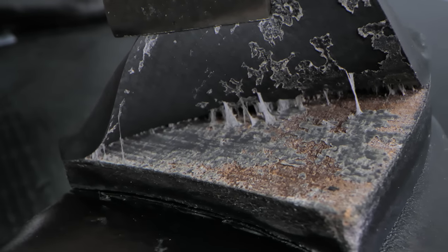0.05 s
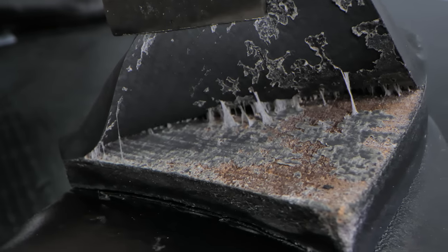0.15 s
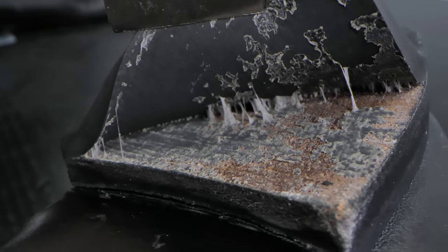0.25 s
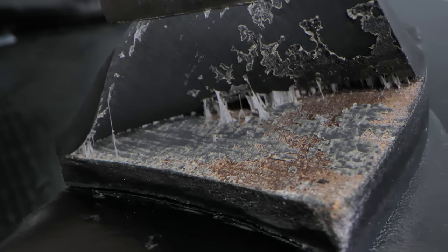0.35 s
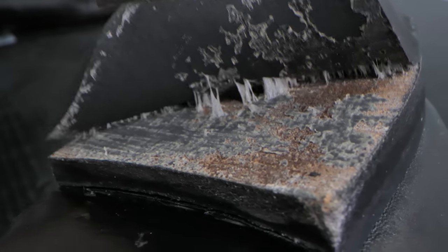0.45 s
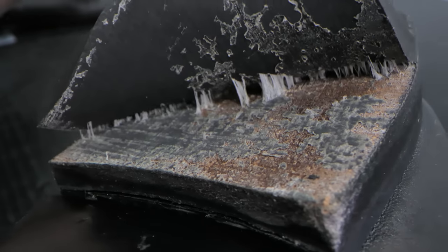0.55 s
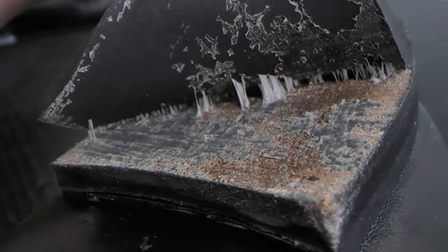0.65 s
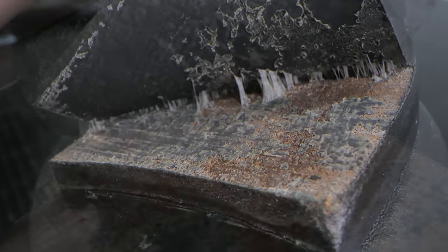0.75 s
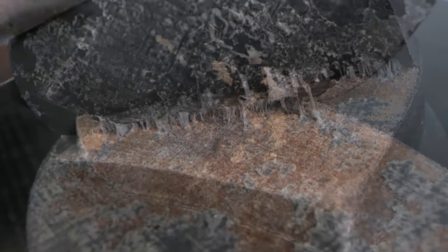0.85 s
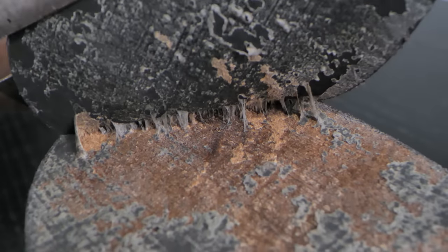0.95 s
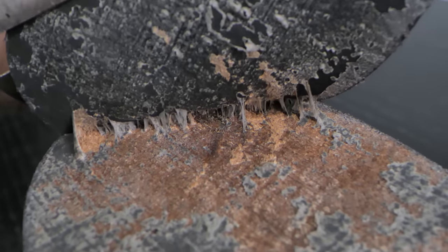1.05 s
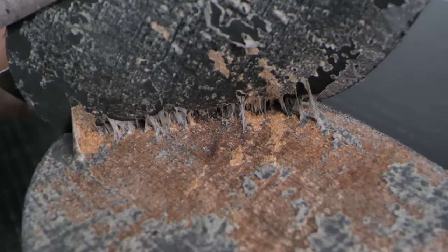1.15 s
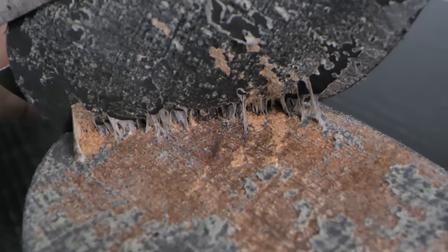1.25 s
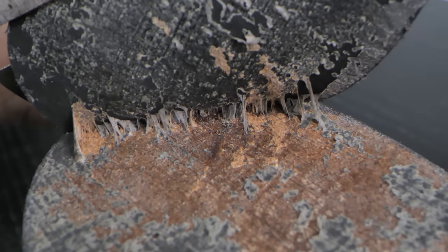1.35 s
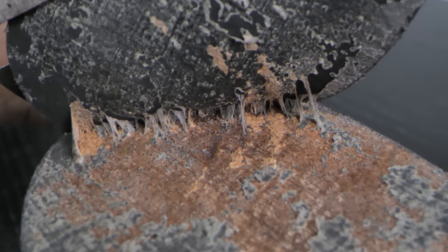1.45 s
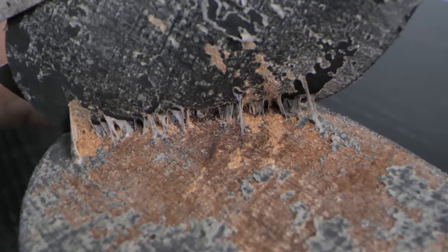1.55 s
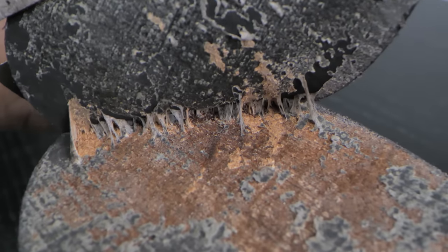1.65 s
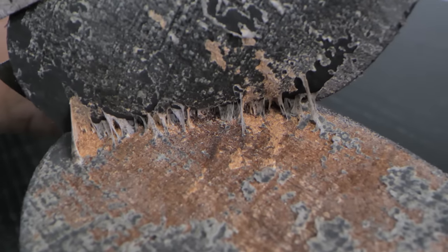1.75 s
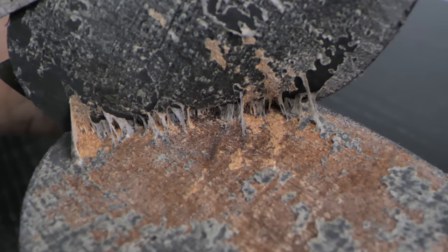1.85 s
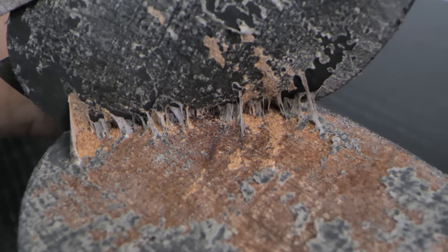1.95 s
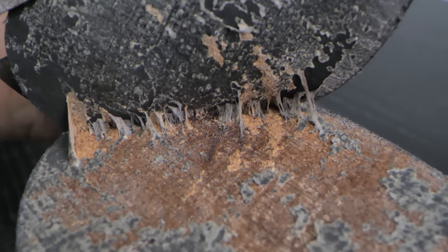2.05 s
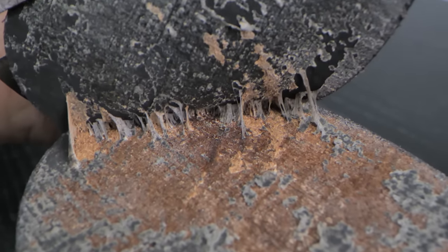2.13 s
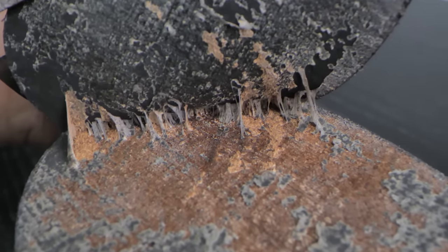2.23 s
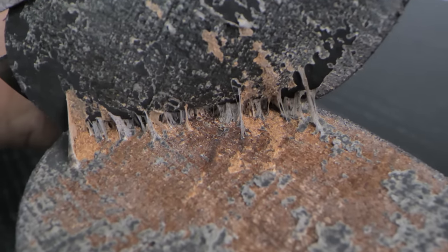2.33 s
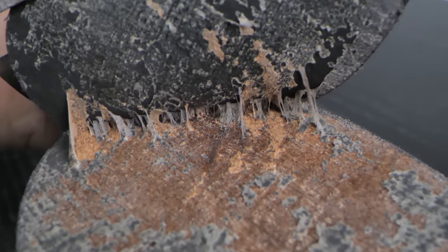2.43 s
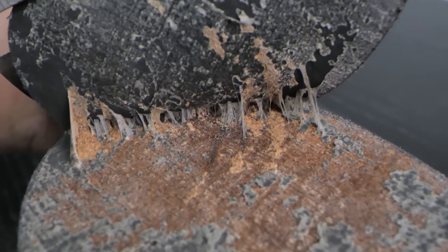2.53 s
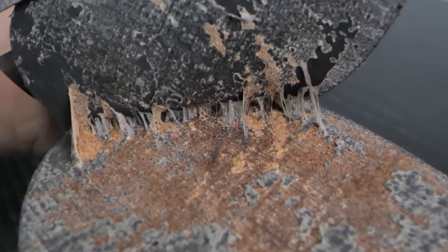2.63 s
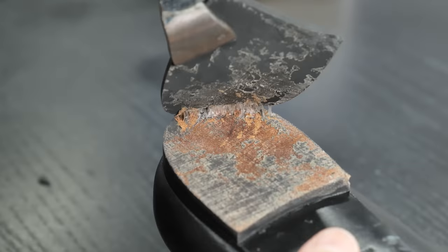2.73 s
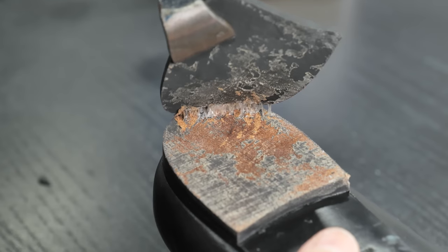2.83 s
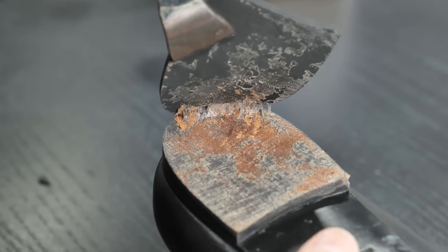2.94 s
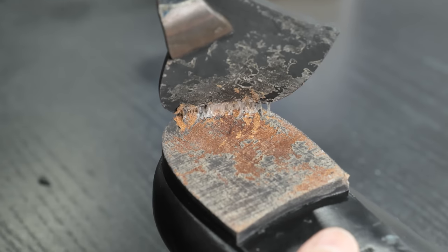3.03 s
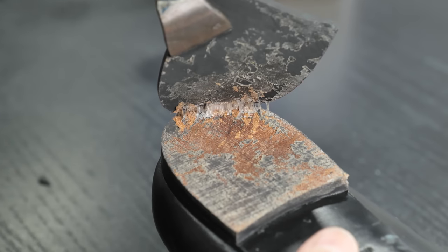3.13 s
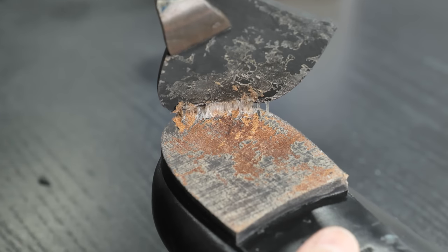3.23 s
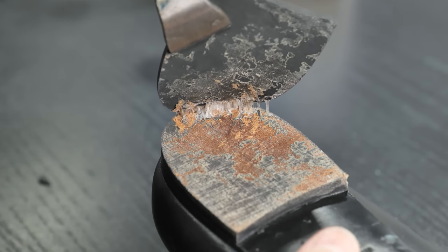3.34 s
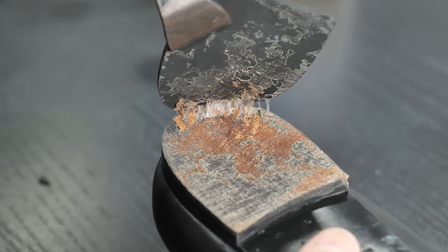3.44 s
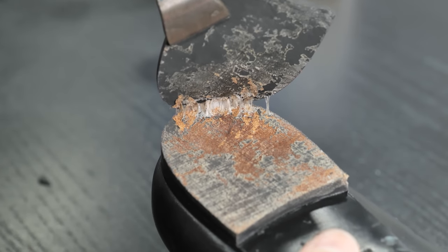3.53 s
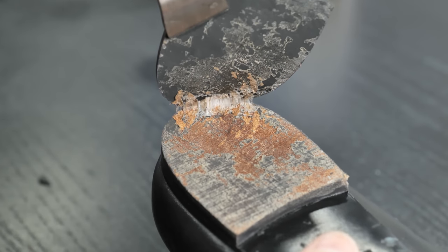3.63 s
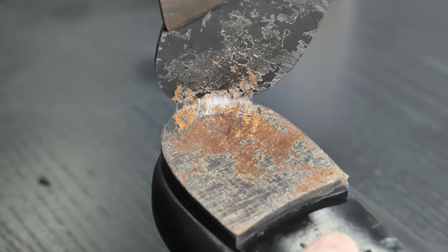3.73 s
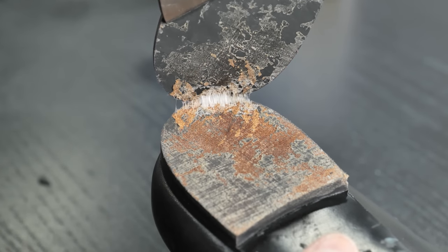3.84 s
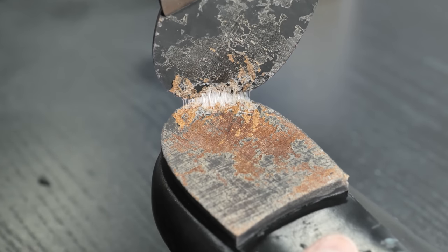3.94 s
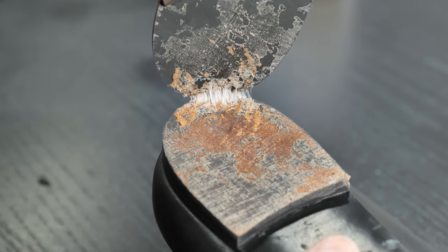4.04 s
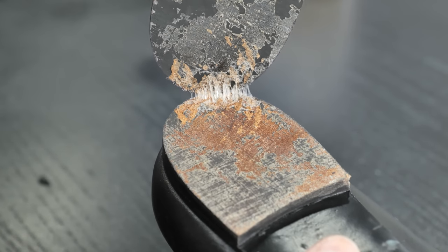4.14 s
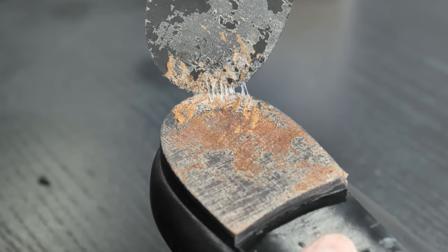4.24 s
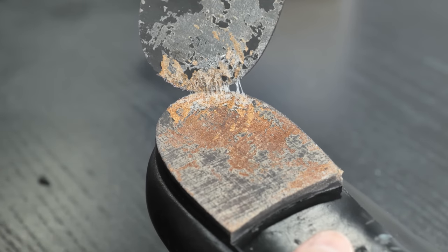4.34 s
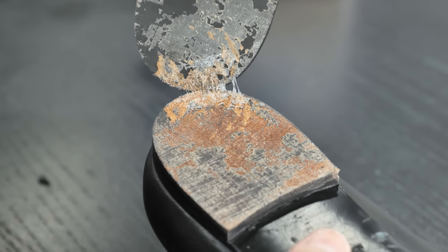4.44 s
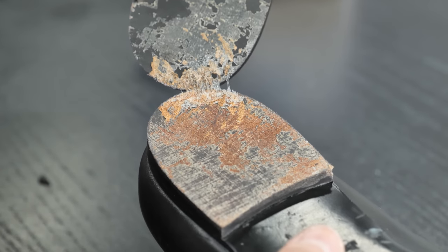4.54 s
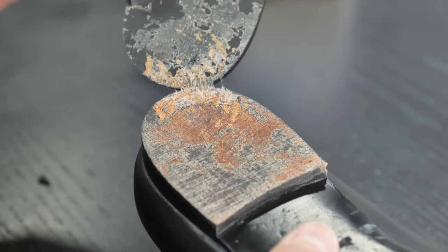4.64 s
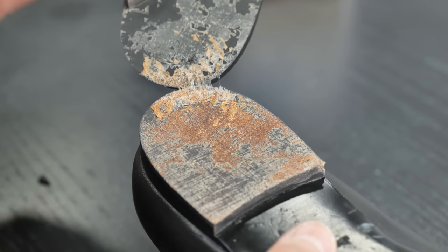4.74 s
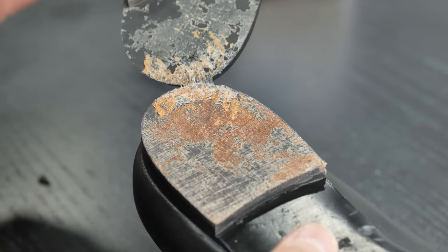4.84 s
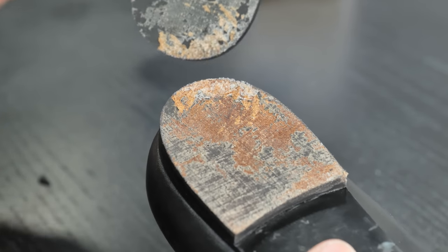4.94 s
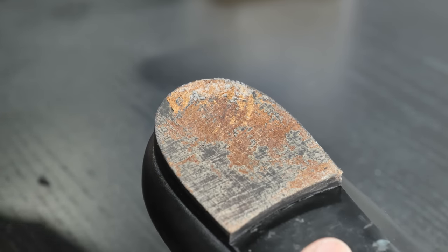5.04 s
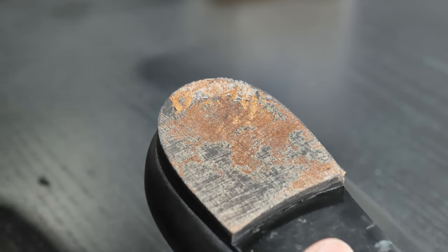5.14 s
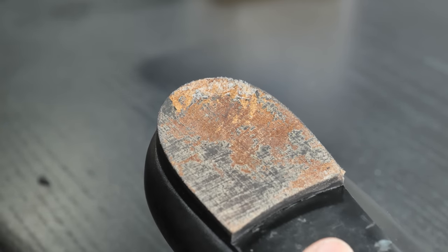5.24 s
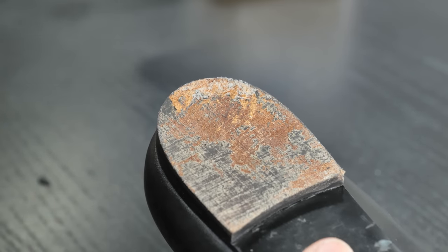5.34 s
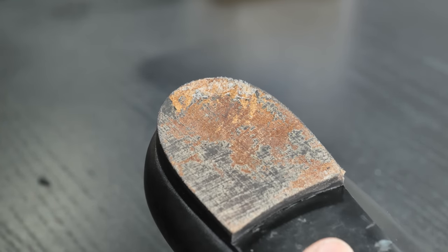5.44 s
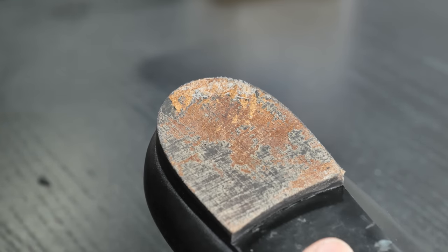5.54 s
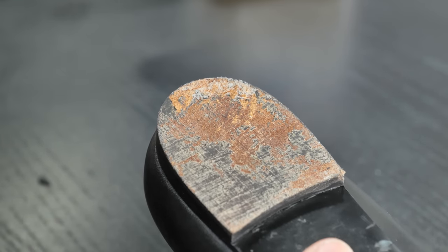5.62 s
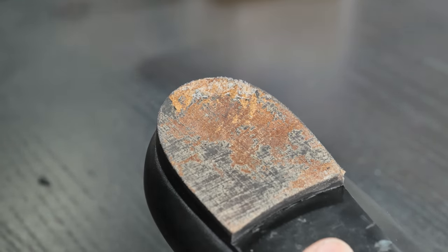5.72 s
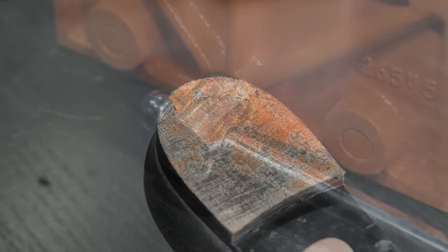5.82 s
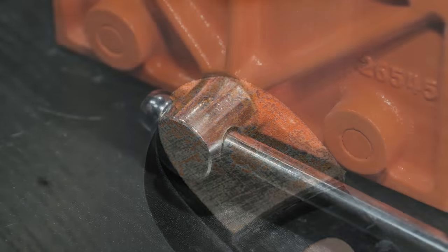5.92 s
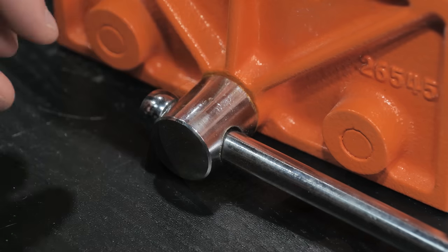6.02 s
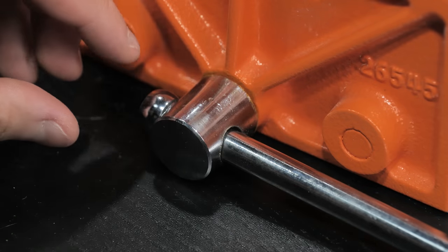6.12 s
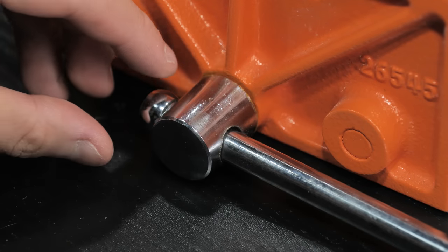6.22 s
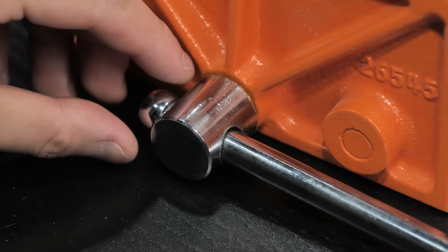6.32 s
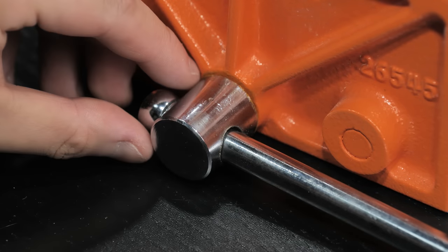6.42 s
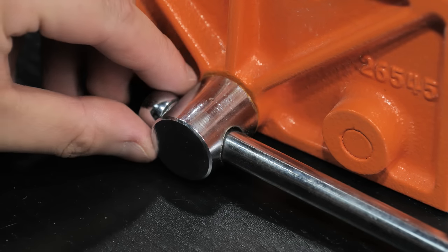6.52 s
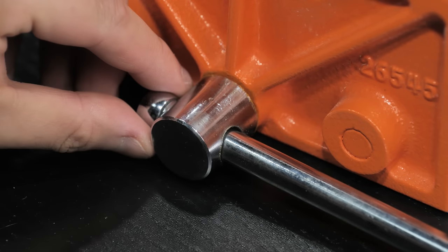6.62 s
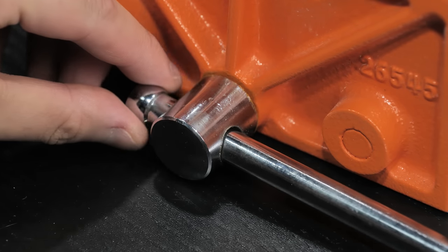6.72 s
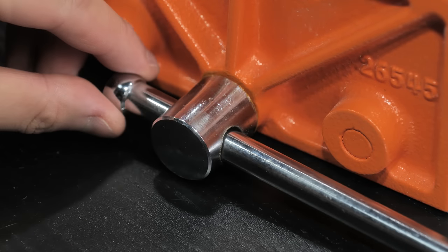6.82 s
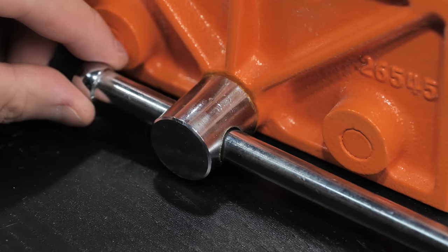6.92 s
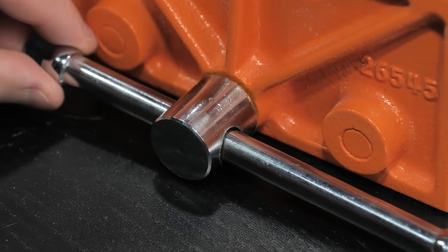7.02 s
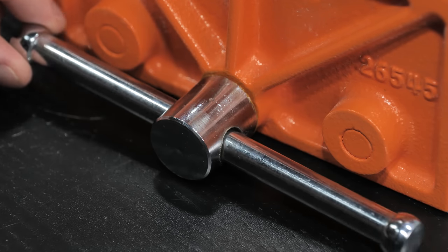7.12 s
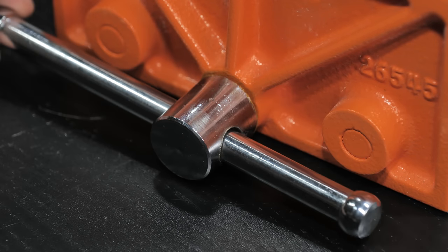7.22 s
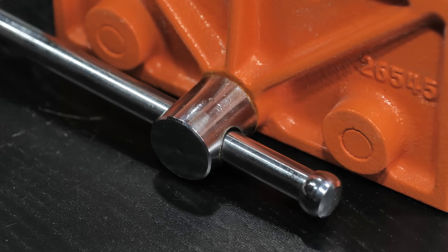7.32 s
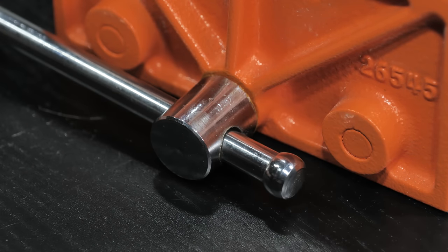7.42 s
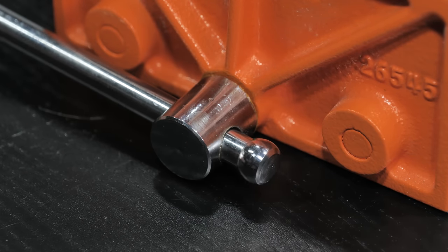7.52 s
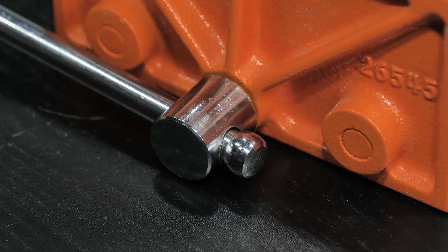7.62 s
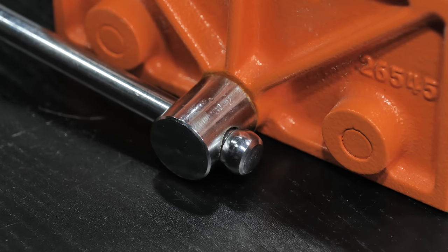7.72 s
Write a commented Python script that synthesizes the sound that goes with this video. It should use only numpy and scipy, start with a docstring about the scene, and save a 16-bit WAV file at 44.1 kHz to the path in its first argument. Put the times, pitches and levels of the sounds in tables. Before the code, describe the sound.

Pliers pull a rubber sole off a shoe heel, and the glue gives a fine, high crackle dotted with sharp snaps. An early rip comes with a knock, then the peeling goes on more softly. The last strands snap with small knocks and the shoe thuds on the bench. After a pause, a steel handle slides through an iron vice, rumbling, scraping and ringing thinly. Heard close up in a quiet workshop.

```python
"""Glue crackles and snaps as a rubber sole is pulled off a shoe heel with pliers. Each strand breaks with
an impulse; whole patches letting go excite the damped modes of the heel, and the shoe drops on the bench
with a thud. After a pause with a faint hiss, a steel handle bar slides through the boss of a cast-iron
vice: friction drives a rumble in the casting, a scrape in the bore and a ringing in the bar.
A low workshop room tone lies under it all."""
import sys
import numpy as np
from scipy import signal
from scipy.fft import rfft, irfft, next_fast_len
from scipy.io import wavfile

SR = 44100
rng = np.random.default_rng(int(sys.argv[2]) if len(sys.argv) > 2 else 0)


def dump(signal):
    """Clip the signal to [-1, 1] and save it as 16-bit WAV at the path in sys.argv[1]."""
    limited = np.clip(np.atleast_2d(signal).T, -1, 1)
    pcm = np.round(limited * 32767).astype(np.int16)
    wavfile.write(sys.argv[1], SR, pcm)


N = 342646

# envelope of the fine crackle between snaps: time_s, level_db
PEEL_ENVELOPE = [(0, -59), (.15, -64), (.3, -67), (.42, -54.5), (.5, -54), (.55, -37), (.63, -54.5),
                 (.87, -57), (.9, -63), (.98, -72.5), (1.07, -63.5), (1.35, -66.5), (1.5, -81.5),
                 (1.6, -74.5), (2.05, -71.5), (2.3, -76), (2.75, -67.5), (2.86, -68), (3.1, -71.5),
                 (3.35, -70), (3.55, -71), (3.62, -58), (3.85, -59.5), (3.92, -65.5), (4.15, -69.5),
                 (4.37, -70), (4.45, -88), (4.94, -89.5), (4.96, -59.5), (5.02, -65), (5.03, -89.5)]
# spectral weighting of the crackle: frequency_hz, gain_db
THREAD_SPECTRUM = [(900, -23.5), (1600, -25), (2200, -21), (2900, -13), (4200, -11.5), (6200, -8),
                   (9500, -6), (15700, 4.5), (16400, -25.5)]
# single thick strands breaking: start_s, level_db, colour_hz
STRAND_SNAPS = [(0.0755, -31, 3750), (0.1087, -30, 6270), (.2045, -41, 6330), (0.262, -37, 6160),
                (.2888, -39.5, 12900), (.3582, -26, 4780), (0.4052, -27, 8000), (.4142, -27, 9100),
                (0.4307, -25.5, 6740), (.4482, -26.5, 6100), (0.4886, -22, 5600), (.503, -22, 11000),
                (0.5209, -11.5, 10200), (0.55, -19, 9560), (0.5968, -17, 5500), (0.685, -31.5, 5100),
                (0.7066, -29.5, 7000), (0.7312, -36.5, 7250), (.7737, -28.5, 6200), (0.777, -26.5, 4400),
                (0.7948, -22, 5800), (.823, -29.5, 10600), (.884, -38, 5000), (1.0348, -37, 8300),
                (1.0821, -35, 9200), (1.1022, -31, 9700), (1.1656, -39, 9200), (1.2342, -33.5, 9400),
                (1.244, -33, 9400), (1.2726, -35.5, 7600), (1.4335, -41.5, 7800), (1.46, -45.5, 7200),
                (1.5472, -36.5, 9900), (1.5775, -32, 6730), (1.6501, -32.5, 6450), (1.7208, -39.5, 9900),
                (1.799, -31, 9200), (1.9886, -36, 9050), (2.0318, -30.5, 10200), (2.0673, -32.5, 10300),
                (2.1218, -40, 6550), (2.2015, -38, 10100), (2.259, -37, 9400), (2.374, -38.5, 9300),
                (2.4272, -39, 6700), (2.4502, -35, 8200), (2.4764, -38, 9550), (2.5478, -30, 9700),
                (2.6094, -23, 11900), (2.6955, -39, 9500), (2.845, -36.5, 9300), (2.9134, -38.5, 10700),
                (3.079, -41, 4530), (3.2583, -43, 14400), (3.286, -41.5, 14500), (3.329, -35, 10900),
                (3.3695, -47, 6140), (3.4126, -35.5, 8300), (3.473, -28.5, 13900), (3.5604, -33.5, 10400),
                (3.6177, -20.5, 10300), (3.7148, -39, 5500), (3.7507, -28.5, 12700), (3.8083, -29.5, 6550),
                (3.847, -29.5, 10700), (3.916, -35.5, 10200), (3.9567, -32, 12100), (4.0711, -25, 10900),
                (4.328, -43, 4040), (4.38, -44, 9900), (4.56, -49.5, 6650), (4.636, -26, 5560),
                (4.661, -30.5, 4180), (4.7668, -28, 3550), (4.8648, -23.5, 4200), (4.9488, -27, 3160),
                (4.995, -25, 4670), (5.0056, -26.5, 7200), (5.047, -31.5, 2760), (5.24, -55.5, 2570),
                (5.3765, -59.5, 5380), (5.3943, -61, 2330), (5.567, -55.5, 2450)]
# blows to heel and bench: start_s, knock_db, knock_centre_hz, thud_db, thud_centre_hz
HEEL_JOLTS = [(.077, -30, 860, -37, 125), (.358, -40.5, 887, -58.5, 146), (.526, -29.5, 1050, -42, 104),
              (.531, -43, 800, -36.5, 148), (.545, -48, 1020, -39.5, 272), (.556, -22.5, 884, -49.5, 158),
              (.793, -46.5, 960, -68, 102), (1.235, -59, 1320, -70, 200), (1.576, -46, 1480, -61, 256),
              (1.65, -49, 1330, -70, 124), (3.684, -47, 1200, -62, 213), (3.716, -40, 1210, -56, 250),
              (3.743, -49, 1220, -68, 248), (3.801, -41.5, 1430, -59, 218), (4.635, -30, 861, -50, 264),
              (4.661, -34.5, 1180, -42, 198), (4.768, -35, 1160, -52.5, 229),
              (4.865, -30.5, 1200, -47, 224), (4.95, -27.5, 1450, -45.5, 316), (4.996, -37, 884, -51, 229),
              (5.0444, -14.5, 894, -13, 244), (5.164, -59.5, 700, -40.5, 241)]
# modes of the heel: pitch_hz, gain_db, t60_s
HEEL_MODES = [(614, 0, .035), (732, 0, .035), (861, -1, .03), (960, -1, .03), (1061, -2, .03),
              (1200, -1, .035), (1470, -3, .025), (1790, -5, .015)]
# modes of the bench: pitch_hz, gain_db, t60_s
BENCH_MODES = [(118.2, -13, 0.3), (138, -4, 0.18), (229, -15.5, .25), (244.5, -3, 0.2), (305, -10.5, .1),
               (378, -12.5, .12), (610.5, 5.5, 0.058), (861, 4.5, 0.13), (1091, 6.5, 0.097)]
# envelope of the sliding bar: time_s, rumble_db, scrape_db
SLIDE_ENVELOPE = [(6.68, -89, -103), (6.734, -37.5, -71), (6.882, -28, -49), (6.894, -30, -49),
                  (6.972, -23, -45.5), (7.072, -32, -46), (7.124, -27.5, -44.5), (7.398, -39, -57.5),
                  (7.43, -34.5, -51), (7.47, -39.5, -54), (7.528, -32.5, -40), (7.618, -31.5, -42.5),
                  (7.642, -34.5, -55.5), (7.77, -48.5, -71)]
# modes of the iron casting: pitch_hz, width_hz, gain_db
CASTING_MODES = [(154, 5.5, -42.5), (235.2, 10.8, 4), (300, 36, -1.5), (324, 54, -4.5), (384.4, 15, 3),
                 (452, 17.6, -1), (531, 37, -6.5), (639, 36, -0.5), (743, 31.5, -7), (783, 54, -13)]
# spectrum of steel rubbing on iron: frequency_hz, gain_db
SCRAPE_SPECTRUM = [(600, -13.5), (900, 2.5), (1400, 4), (1600, 3), (2100, 0.5), (2600, -1.5), (3300, -8.5),
                   (4200, -9.5), (5600, -16.5), (7000, -28.5), (10000, -24), (13000, -52), (15000, -78)]
# resonances of the bore: pitch_hz, width_hz, gain_db
BORE_MODES = [(1150, 160, -3), (1570, 130, 0), (1760, 110, -2), (2050, 150, -2), (2560, 130, -6),
              (3000, 200, -11), (3660, 150, -14)]
# modes of the steel bar: pitch_hz, base_width_hz, gain_db
BAR_MODES = [(4735, 30, -1), (4790, 80, -9), (9140, 45, -3), (9230, 45, -5), (14780, 25, -13)]
# the bar leans on the edge of the bore and sings: peak_s, low_modes_db, high_modes_db
BAR_SWELLS = [(6.87, -84, -67), (6.98, -57, -64), (7.14, -51, -70), (7.192, -43, -43.5),
              (7.358, -49, -53.5), (7.444, -54, -61.5), (7.53, -51, -49.5), (7.6, -60, -84)]
# shorter lengths of bar that ring as its ball knob nears the bore: pitch_hz, width_hz, level_db
OVERHANG_MODES = [(4130, 580, -59), (5450, 49, -75), (7700, 260, -67), (11060, 350, -68), (12400, 40, -81)]
# envelope of the faint hiss: time_s, level_db
HISS_ENVELOPE = [(5.1, -88.5), (5.74, -82), (5.768, -66.5), (5.94, -79), (5.945, -120)]
# heavy heaves that shake the bench: peak_s, level_db
BENCH_HEAVES = [(.12, -67), (.57, -56.5), (5.04, -59)]
# spectrum of the room tone: frequency_hz, gain_db
ROOM_SPECTRUM = [(35, -26), (60, -7), (217, 6), (308, -3.5), (363, -4), (417, -9), (566, -5), (785, -11),
                 (1010, -5.5), (1740, -18.5), (4750, -33.5), (11000, -44), (12700, -54), (16000, -52.5)]
# likeness of left and right: frequency_hz, coherence
STEREO_COHERENCE = [(60, .7), (125, 0.9), (300, 0.88), (600, .85), (1200, 0.4), (2500, .4), (8000, 0.16)]
# stages of the job, each heard from its own place: start_s, tilt_db_per_octave, pan_db, room_tone_db
JOB_STAGES = [(0, -3.5, -4.5, -66.5), (.9, 1, -2.5, -67.5), (2.8, 4.5, -7, -63), (4.2, -2.5, -0.5, -64.5),
              (4.5, -3, 1, -65), (5.945, -1, -1.5, -74.5)]

FRAY_DB, FRAY_T60_S = -34, .1   # thin threads beside a snapped strand go on breaking
CONTACT_S = 0.00052   # rubber and leather give, so a jolt is a short push
SING_RISE_DB_PER_S, SING_FALL_DB_PER_S, SING_UNDER_SCRAPE_DB = 397.5, 296, -30
OVERHANG_FADE_S = [7.5033, 7.505, 7.608, 7.627]   # fades in, holds, fades out
HEAVE_RISE_DB_PER_S, HEAVE_FALL_DB_PER_S, SHAKE_UNDER_TONE_DB = 80, 64.5, -17.5
CUTOFF_HZ = 17000


def glue_crackle():
    """Acoustic emission: thin threads break in clumps, each impulse exciting one of six bands."""
    tilt_db, pan_db, _ = stage_settings()
    snap_s, snap_db, _ = np.transpose(STRAND_SNAPS)
    peeling = amp(envelopes(PEEL_ENVELOPE)[0]) * (np.arange(N) < PEEL_ENVELOPE[-1][0] * SR)
    fraying = swells(snap_s, snap_db + FRAY_DB, 1e5, 60 / FRAY_T60_S)
    level = peeling + fraying + 1e-7
    per_s = 1200 * (level / amp(-65)) ** 0.82   # a faster rip breaks more threads
    breaks = level * impulses(per_s * amp(3 * drift(40)), spread_db=4) / np.sqrt(per_s / 600)
    band_of_break, threads = rng.integers(0, 6, N), 0
    for k, hz in enumerate(np.geomspace(2500, 14000, 6)):
        clicks = breaks * (band_of_break == k) * amp(tilt_db * np.log2(hz / 6000))
        band = resonance(resonance(clicks, hz, 0.46 * hz), hz, 0.46 * hz) / np.sqrt(hz)
        threads += np.array([np.roll(band, k % 2), band])   # odd bands reach the left a sample later
    # the hollow of the heel resonates too, higher once the sole is lifted wide
    lifted = np.arange(N) >= JOB_STAGES[1][0] * SR
    hollow = np.where(lifted, amp(8.5) * steep_band(breaks, 1300, 300), steep_band(breaks, 830, 220))
    hollow *= amp(-17.5 - 1.5 * tilt_db)
    return np.std(level) * (panned(coloured(threads, THREAD_SPECTRUM), pan_db) + hollow)


def strand_snaps():
    """Sudden release of tension: a click, then a noise burst whose decay time goes as 1 / frequency."""
    length = 1024
    snaps, t = np.zeros((2, N)), np.arange(length) / SR
    for start_s, level_db, hz in STRAND_SNAPS:
        spray = 0.27 * rng.standard_normal((2, length)) * amp(-60 * t * hz / 30.4)
        burst = bandpass((t == 0) + spray, 0.46 * hz, min(1.517 * hz, 20000))
        start = round(start_s * SR)
        snaps[:, start:start + length] += amp(level_db) * burst / np.abs(burst).max()
    return panned(snaps, pan_db=stage_settings()[1])


def heel_jolts():
    """Impact excitation: heel and bench ring freely; the finite contact time softens the treble."""
    start_s, knock_db, knock_hz, thud_db, thud_hz = np.transpose(HEEL_JOLTS)
    knock = struck(start_s, knock_db, knock_hz, HEEL_MODES, falloff_db_per_octave=30)
    thud = struck(start_s, thud_db, thud_hz, BENCH_MODES, falloff_db_per_octave=17)
    ringing = bandpass(knock, 500, 2400) + bandpass(thud, 100, 1500, order=3)
    push = np.hanning(round(CONTACT_S * SR))
    return signal.lfilter(push / push.sum(), 1, ringing)


def sliding_bar():
    """Friction noise: rough steel catches on iron, and the contacts drive casting, bore and bar."""
    start = round(SLIDE_ENVELOPE[0][0] * SR)
    rumble_db, scrape_db = np.array(envelopes(SLIDE_ENVELOPE))[:, start:]
    mid_side = []
    for _ in range(2):
        contacts = rms_one(impulses(4000 * amp(2.5 * drift(37)), spread_db=3)[start:])
        rumble = amp(rumble_db) * casting_rumble(contacts)
        scrape = amp(scrape_db) * bore_scrape(contacts)
        mid_side.append(rumble + scrape + bar_ringing(contacts, scrape_db, start))
    above_top_mode = signal.cheby2(10, 40, 15600, fs=SR, output="sos")
    slide = signal.sosfilt(above_top_mode, stereo(*mid_side))
    return np.pad(slide, ((0, 0), (start, 0)))


def casting_rumble(contacts):
    """Modal superposition: the low modes of the casting add with alternating polarity."""
    modes = sum((-1) ** k * amp(db) * resonance(contacts, hz, width_hz)
                for k, (hz, width_hz, db) in enumerate(CASTING_MODES))
    return rms_one(bandpass(modes, 125, 1100, order=3))


def bore_scrape(contacts):
    """Source and filter: broadband contact noise, joined by the resonances of the bore."""
    return coloured(contacts, SCRAPE_SPECTRUM) + amp(-7) * rms_one(driven(contacts, BORE_MODES))


def bar_ringing(contacts, scrape_db, start):
    """Resonance: the lightly damped bar sings and grates as it leans on the edge of the bore."""
    peak_s, low_db, high_db = np.transpose(BAR_SWELLS)
    floor = amp(scrape_db + SING_UNDER_SCRAPE_DB)
    low, high = (floor + swells(peak_s, db, SING_RISE_DB_PER_S, SING_FALL_DB_PER_S)[start:]
                 for db in (low_db, high_db))
    singing = 0
    for hz, base_width_hz, db in BAR_MODES:
        gain = amp(db + 3.2 * drift(23)[start:]) * (low if hz < 6000 else high)
        singing += gain * steep_band(contacts, hz, 2.9 * base_width_hz)
    near_end = np.interp(np.arange(start, N) / SR, OVERHANG_FADE_S, [0, 1, 1, 0])
    grating = amp(-15) * high * rms_one(bandpass(contacts, 4500, 14000))
    return singing + near_end * driven(contacts, OVERHANG_MODES) + grating


def faint_hiss():
    """Band-limited noise, incoherent between left and right, swells and then stops."""
    hiss = bandpass(rng.standard_normal((2, N)), 1200, 11000, order=3)
    return amp(envelopes(HISS_ENVELOPE)[0]) * rms_one(hiss)


def workshop():
    """Ambient noise: a wavering room tone, and low vibration of the bench that swells at each heave."""
    mid, side = (coloured(rng.standard_normal(N), ROOM_SPECTRUM) for _ in range(2))
    shake_mid, shake_side = bandpass(rng.standard_normal((2, N)), 18, 70)
    shake = rms_one(panned(shake_mid, [-5]) + .5 * shake_side * [[1], [-1]])
    tone_db = stage_settings()[2]
    heaves = swells(*np.transpose(BENCH_HEAVES), HEAVE_RISE_DB_PER_S, HEAVE_FALL_DB_PER_S)
    tone = amp(tone_db + 1.5 * drift(11)) * stereo(mid, side)
    return tone + (amp(tone_db + SHAKE_UNDER_TONE_DB) + heaves) * shake


def reflections(x, t60_s, onset_s, dull_hz):
    """Diffuse reverberation: convolution with decaying noise of unit energy, separate in each channel."""
    t = np.arange(int(t60_s * SR)) / SR
    tails = rng.standard_normal((2, len(t))) * amp(-60 * t / t60_s) * np.clip(t / onset_s, 0, 1) ** 2
    tails = bandpass(tails, 300, dull_hz, order=1)
    tails /= np.linalg.norm(tails, axis=1, keepdims=True)
    return signal.fftconvolve(x, tails, axes=1)[:, :N]


def struck(start_s, level_db, centre_hz, modes, falloff_db_per_octave):
    """Free vibration: each blow starts damped sinusoids, favouring those near its centre frequency."""
    ringing, starts = np.zeros(N), np.round(start_s * SR).astype(int)
    for hz, mode_db, t60_s in modes:
        clicks = np.zeros(N)
        clicks[starts] = amp(level_db + mode_db - falloff_db_per_octave * np.abs(np.log2(hz / centre_hz)))
        r, w = amp(-60 / (t60_s * SR)), 2 * np.pi * hz / SR
        ringing += signal.lfilter([0, np.sin(w)], [1, -2 * r * np.cos(w), r * r], clicks + 1e-18)
    return ringing


def driven(force, modes):
    """Forced vibration: the responses of all modes to one force add."""
    return sum(amp(db) * steep_band(force, hz, width_hz) for hz, width_hz, db in modes)


def resonance(x, hz, width_hz):
    """Two-pole resonator with unit peak gain."""
    r = np.exp(-np.pi * width_hz / SR)
    gain = (1 - r * r) / 2
    return signal.lfilter([gain, 0, -gain], [1, -2 * r * np.cos(2 * np.pi * hz / SR), r * r], x)


def steep_band(x, hz, width_hz):
    """Two resonators in cascade steepen the skirts; rms 1."""
    return rms_one(resonance(resonance(x, hz, width_hz), hz, width_hz))


def bandpass(x, low_hz, high_hz, order=2):
    """Maximally flat band-pass filter."""
    return signal.sosfilt(signal.butter(order, [low_hz, high_hz], "band", fs=SR, output="sos"), x)


def impulses(per_s, spread_db):
    """Shot noise: clicks of random time and sign, a few much larger than the rest."""
    sizes = amp(spread_db * np.minimum(rng.exponential(1, N), 3.5)) * rng.choice([-1, 1], N)
    return sizes * (rng.random(N) < per_s / SR)


def drift(rate_hz):
    """Slow random modulation: noise twice through a one-pole low-pass; rms 1."""
    r = np.exp(-2 * np.pi * rate_hz / SR)
    return rms_one(signal.lfilter([1], [1, -2 * r, r * r], rng.standard_normal(N + SR))[SR:])


def stereo(mid, side):
    """Partial coherence: left and right are alike in the bass and differ in the treble."""
    mid = filtered(mid, lambda hz: np.sqrt((1 + at_hz(STEREO_COHERENCE, hz)) / 2))
    side = filtered(side, lambda hz: np.sqrt((1 - at_hz(STEREO_COHERENCE, hz)) / 2))
    return mid + side * [[1], [-1]]


def panned(x, pan_db):
    """Level difference between channels; positive is to the left."""
    return x * amp(np.outer([.5, -.5], pan_db))


def coloured(x, spectrum):
    """Spectral weighting by a curve in dB; rms 1."""
    return rms_one(filtered(x, lambda hz: amp(at_hz(spectrum, hz))))


def filtered(x, gain):
    """Multiply the spectrum by gain(hz)."""
    size = next_fast_len(x.shape[-1] + SR // 4)
    return irfft(rfft(x, size) * gain(np.fft.rfftfreq(size, 1 / SR)), size)[..., :x.shape[-1]]


def at_hz(curve, hz):
    """Interpolate on a logarithmic frequency axis."""
    curve_hz, values = np.transpose(curve)
    return np.interp(np.log(hz + 1), np.log(curve_hz), values)


def swells(peak_s, peak_db, rise_db_per_s, fall_db_per_s):
    """Sum of envelopes that grow and decay exponentially."""
    hop = 32
    after_s = np.arange(0, N, hop) / SR - peak_s[:, None]
    db = peak_db[:, None] + np.where(after_s < 0, rise_db_per_s, -fall_db_per_s) * after_s
    return np.repeat(amp(db).sum(axis=0), hop)[:N]


def envelopes(rows):
    """Interpolate each column in time."""
    time_s, *columns = np.transpose(rows)
    return [np.interp(np.arange(N) / SR, time_s, column) for column in columns]


def stage_settings():
    """Tilt, pan and room tone level, held through each stage."""
    start_s, *columns = np.transpose(JOB_STAGES)
    stage = np.searchsorted(start_s, np.arange(N) / SR, "right") - 1
    return [column[stage] for column in columns]


def amp(db):
    return 10 ** (np.asarray(db) / 20)


def rms_one(x):
    return x / np.sqrt(np.mean(x ** 2) + 1e-20)


def scene():
    """Superposition: the shoe with its near and room reflections, the bar, and the background."""
    glue = glue_crackle() + strand_snaps()
    glue += amp(-7) * reflections(glue, t60_s=.022, onset_s=.0025, dull_hz=16000)
    heel = heel_jolts() * np.ones((2, 1))
    heel += amp(-11.5) * reflections(heel, t60_s=.06, onset_s=.0021, dull_hz=3000)
    shoe = glue + heel
    shoe += amp(-22.5) * reflections(shoe, t60_s=.23, onset_s=.0093, dull_hz=5000)
    return shoe + faint_hiss() + sliding_bar() + workshop()


def record(dry):
    """Band limiting: a steep low-pass removes the highest treble."""
    return signal.sosfilt(signal.cheby2(12, 70, CUTOFF_HZ, fs=SR, output="sos"), dry)


dry = scene()
out = record(dry)
dump(out)
```